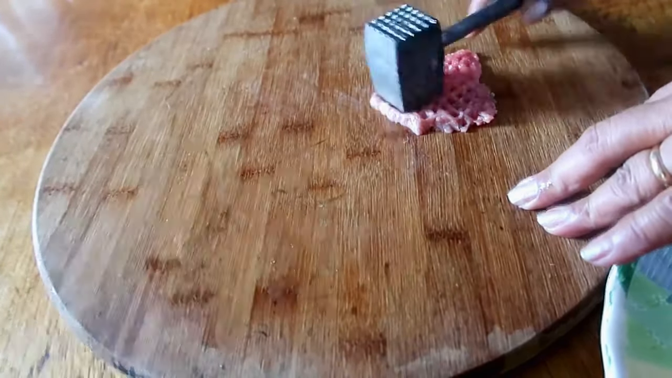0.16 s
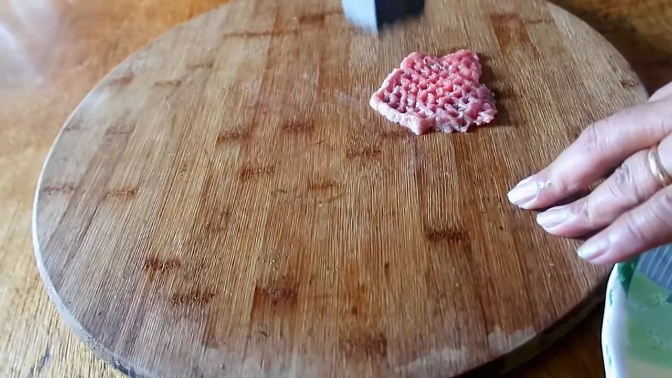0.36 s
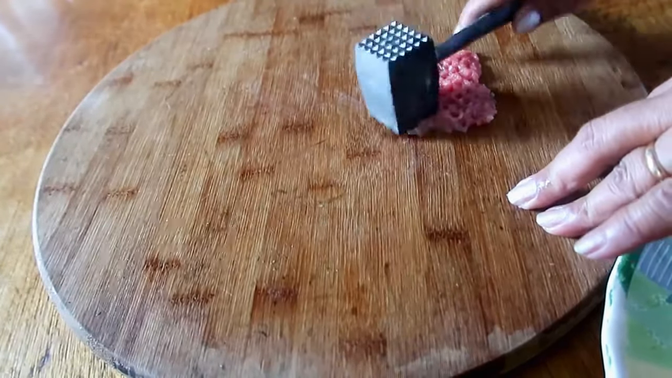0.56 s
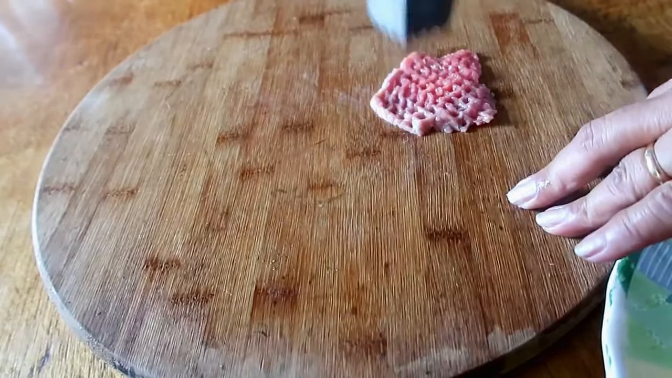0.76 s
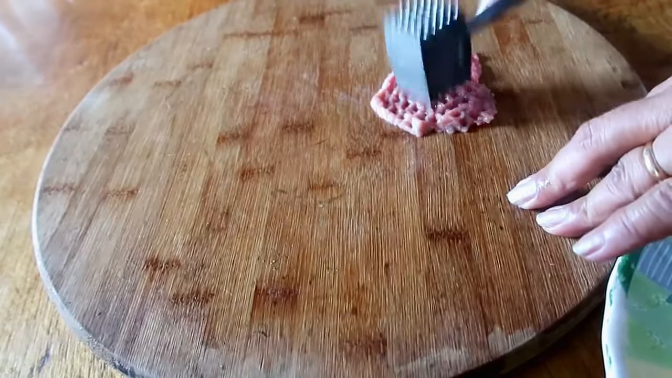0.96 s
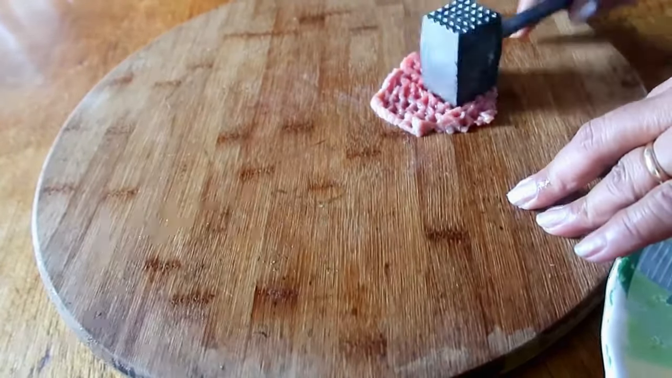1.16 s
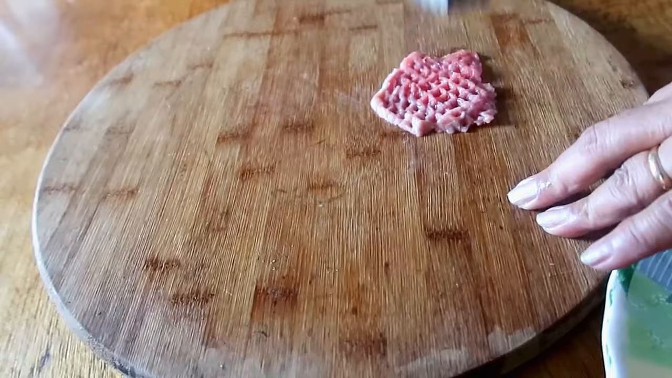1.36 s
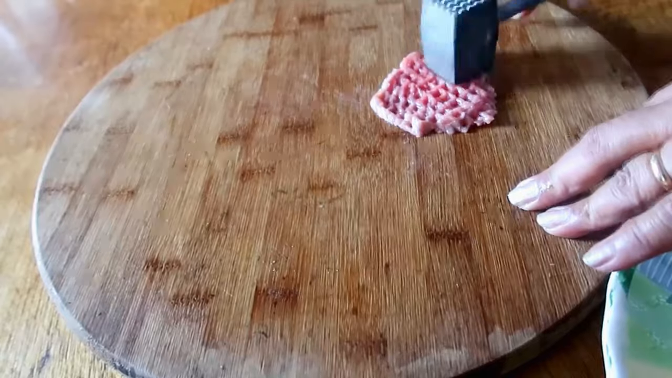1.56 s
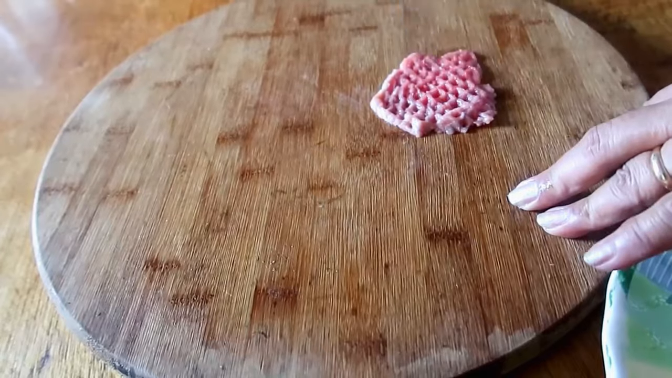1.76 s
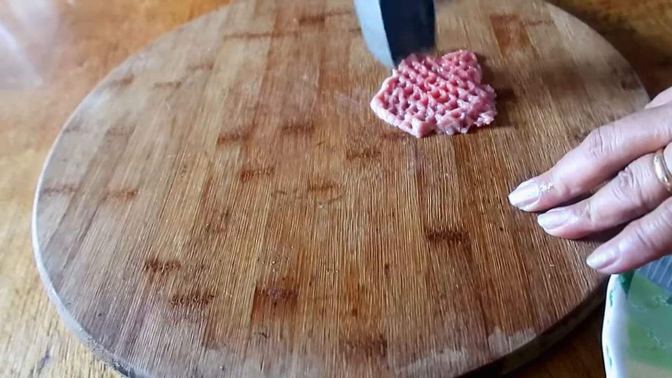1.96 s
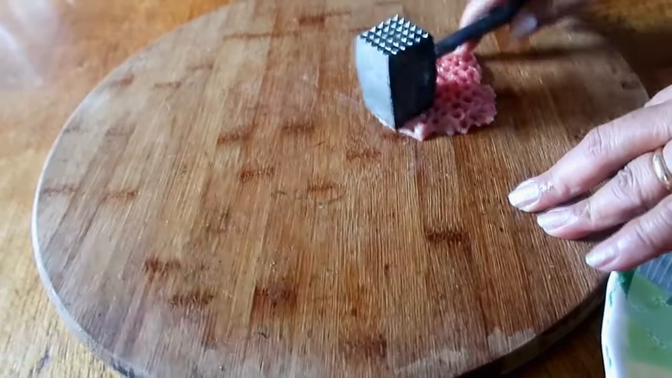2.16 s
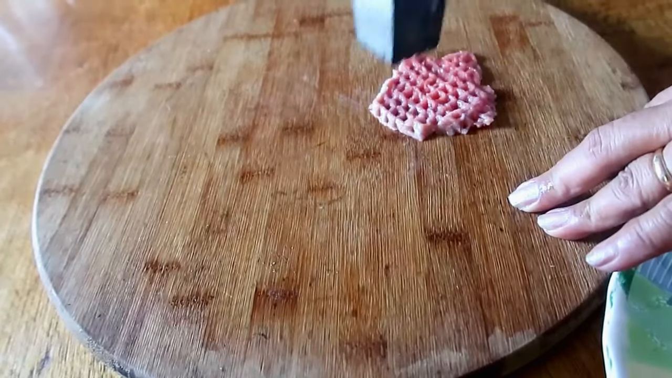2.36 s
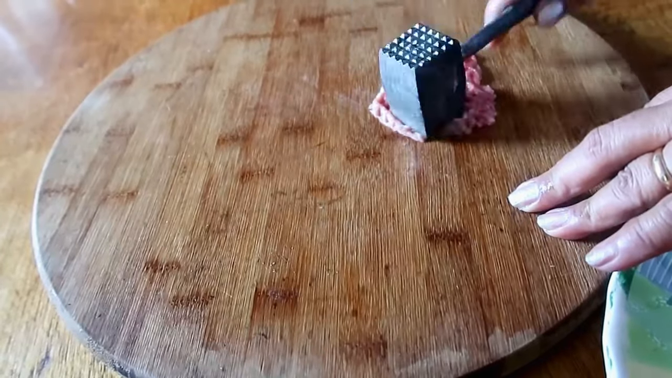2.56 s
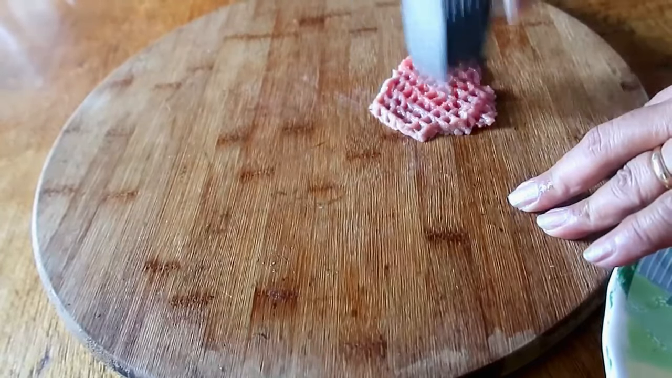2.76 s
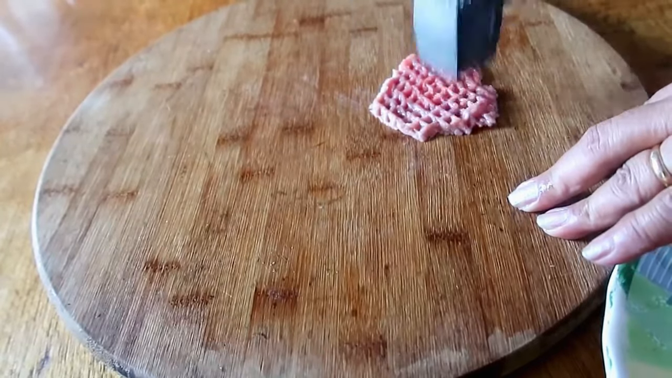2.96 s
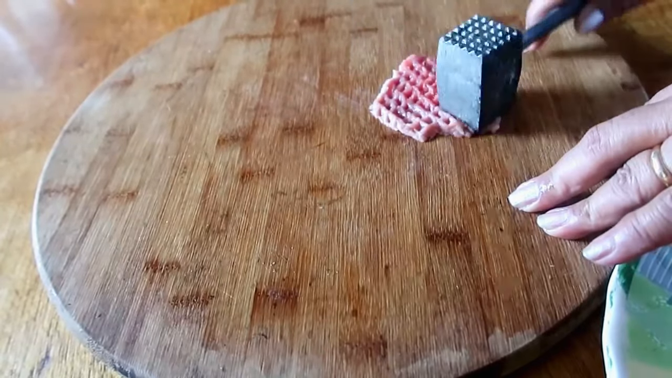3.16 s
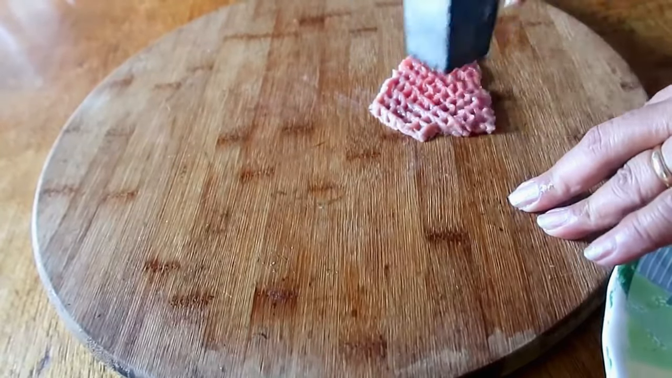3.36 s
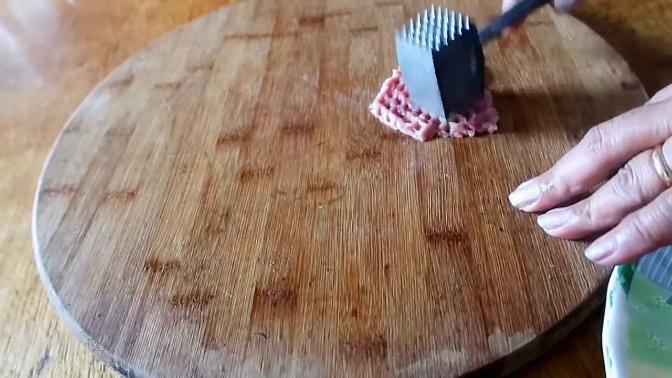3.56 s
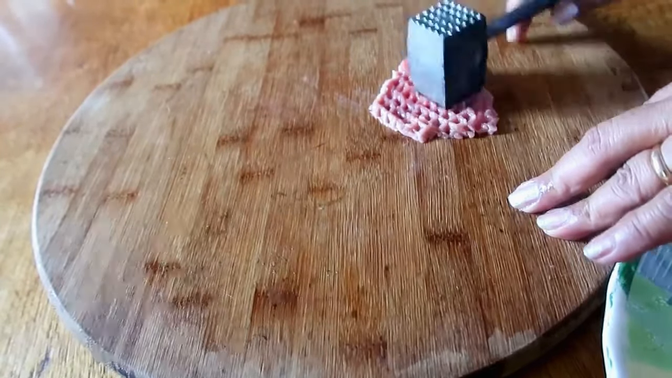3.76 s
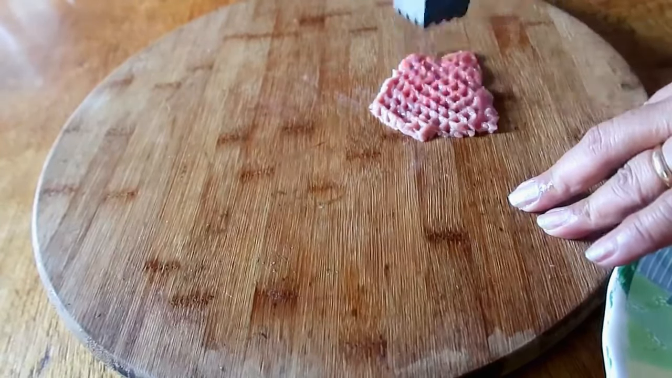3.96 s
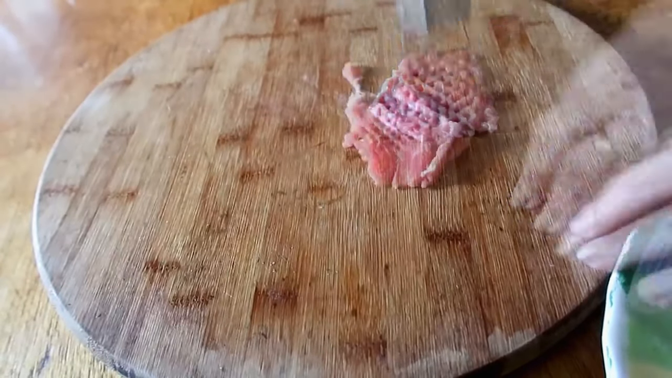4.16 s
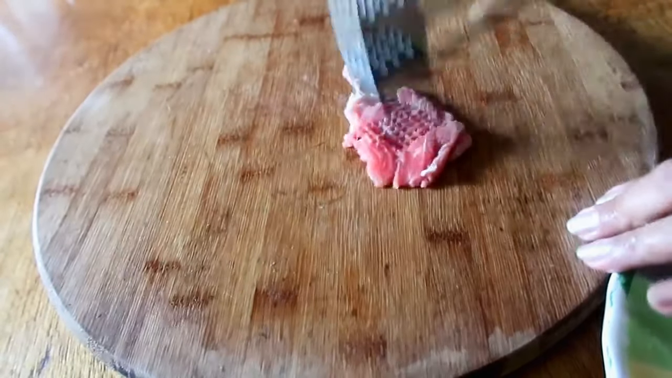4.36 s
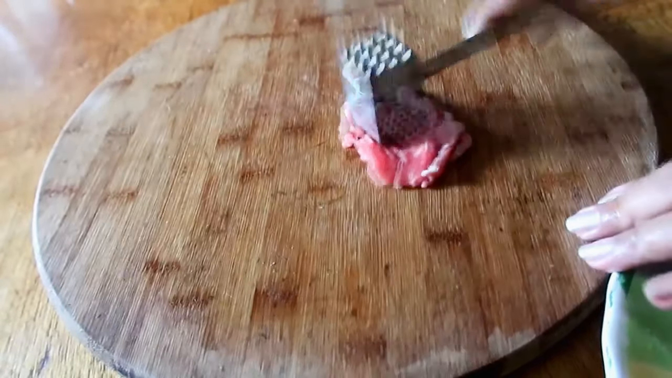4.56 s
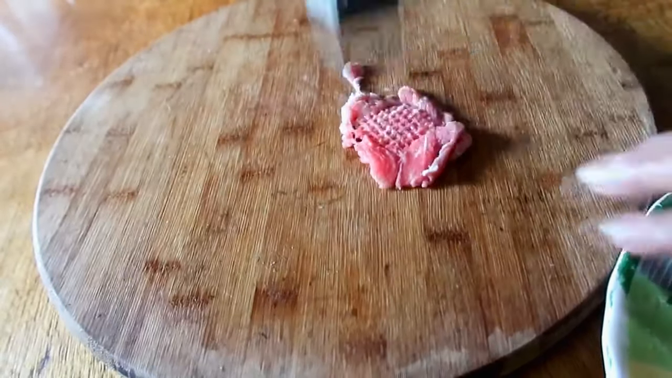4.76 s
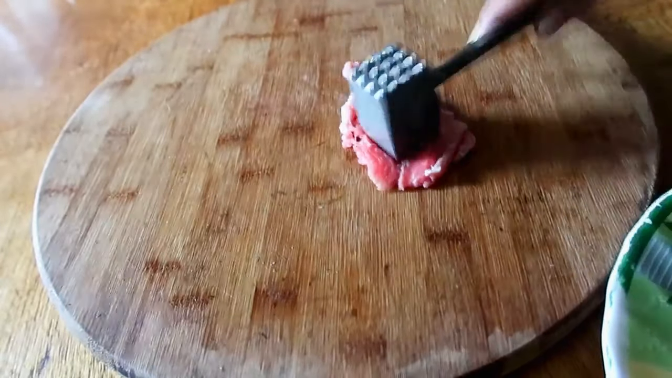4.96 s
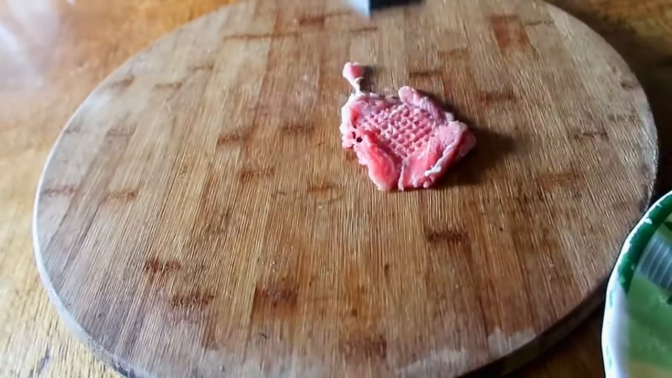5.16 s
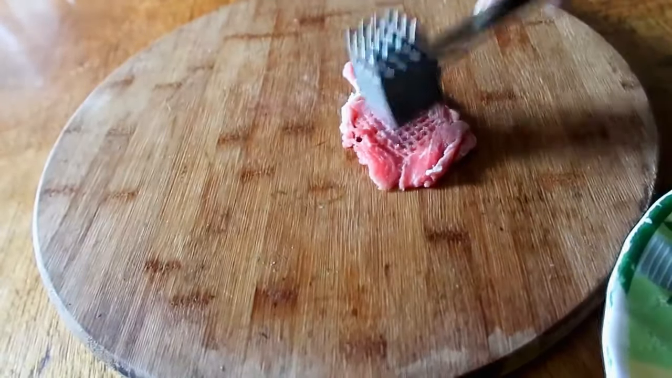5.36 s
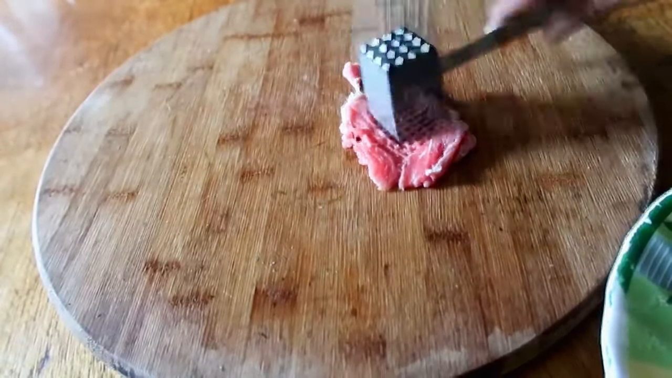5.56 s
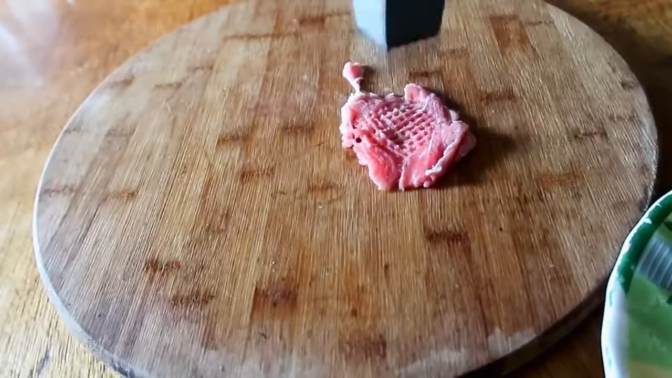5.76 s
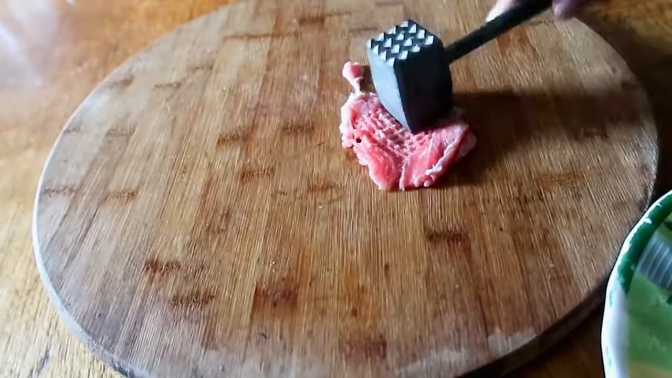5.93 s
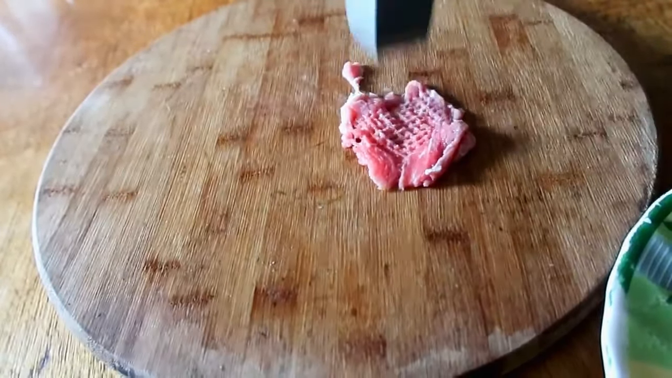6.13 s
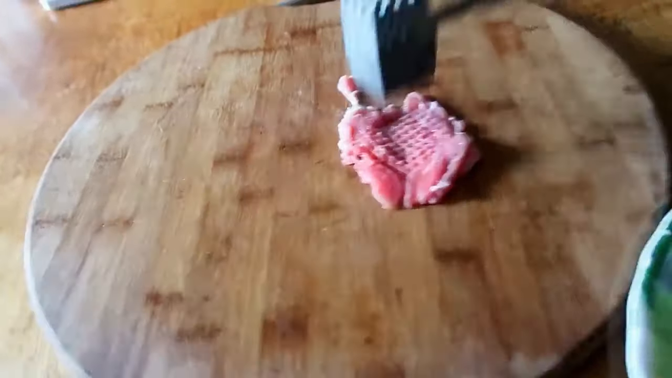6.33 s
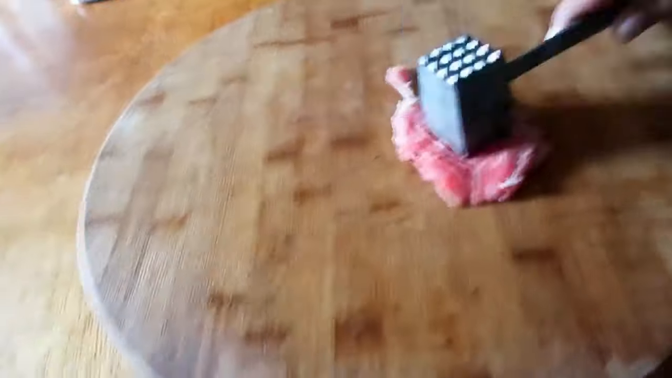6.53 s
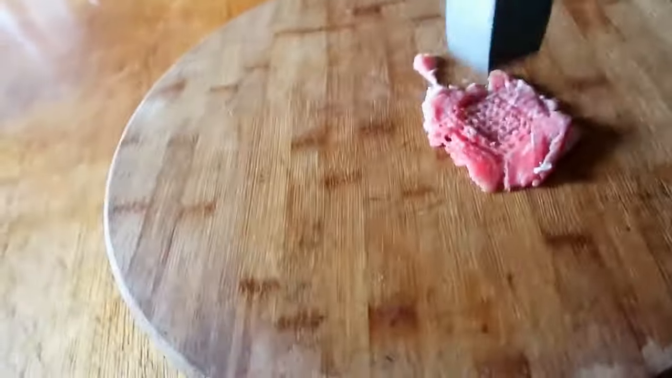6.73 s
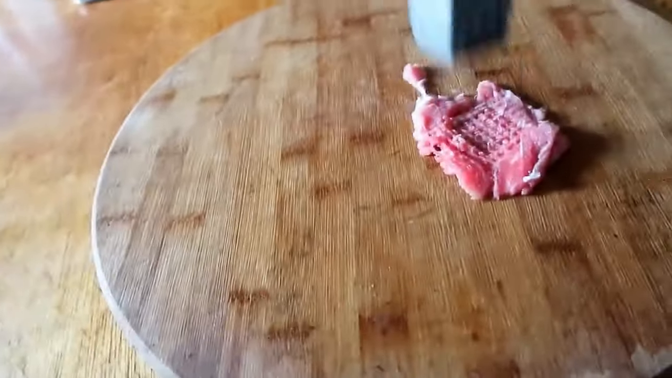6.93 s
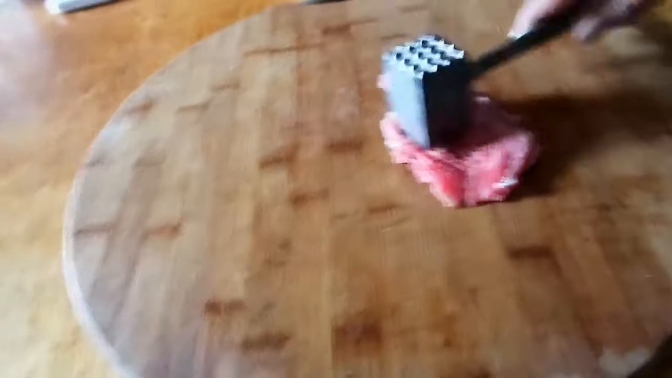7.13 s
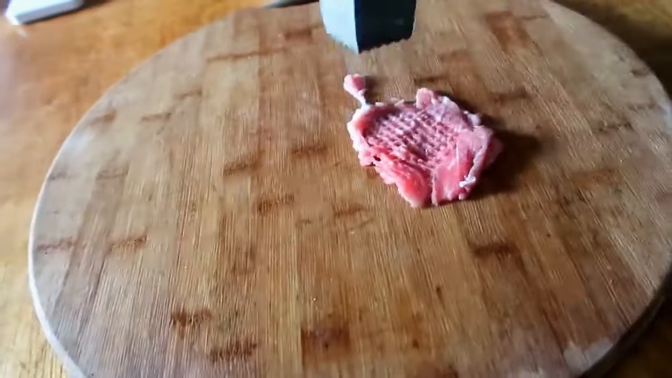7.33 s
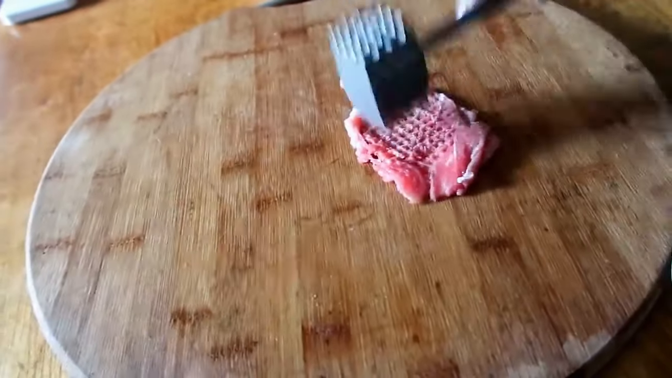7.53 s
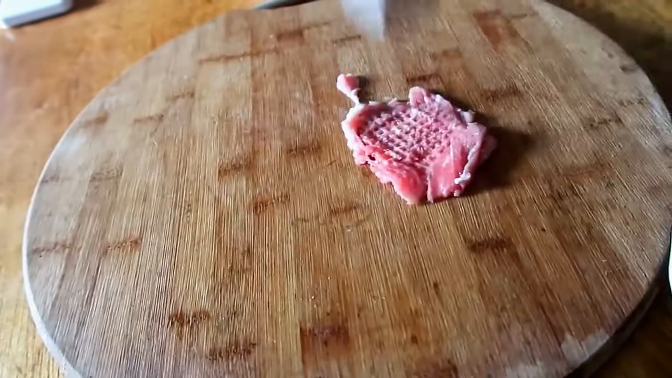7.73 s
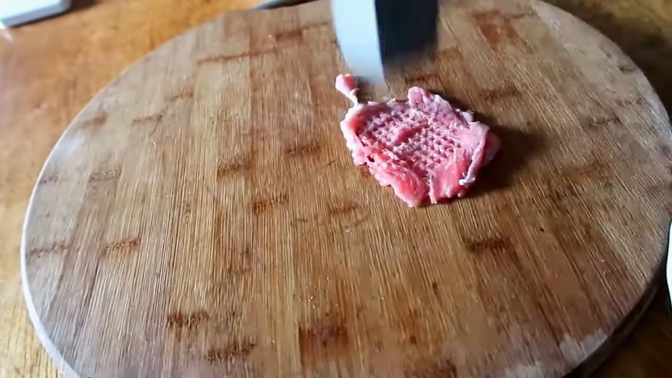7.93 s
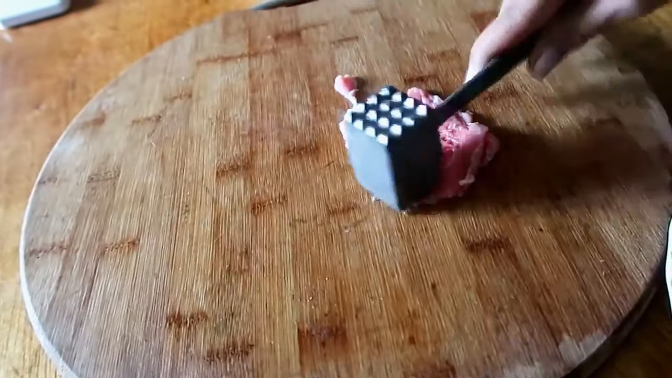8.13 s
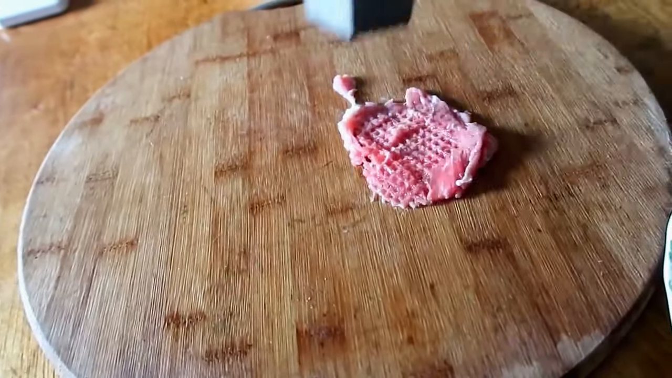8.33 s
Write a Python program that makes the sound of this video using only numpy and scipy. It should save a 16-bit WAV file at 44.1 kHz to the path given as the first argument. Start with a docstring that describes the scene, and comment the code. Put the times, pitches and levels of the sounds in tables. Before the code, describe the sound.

Close, loud pounding of meat on a wooden chopping board, regular and brisk, already under way at the start and continuing to the end. Sharp, dry knocks carry a little wet smack and juicy spitting, strongest in the middle and near the end. Faint sticky rustles come between early hits, small ticks and one dull board nudge later. Low soft room noise lies beneath, with a short kitchen tail on every strike.

```python
"""A metal mallet pounds a thin slice of beef on a round wooden board in a kitchen, about three blows a second.
Each blow drives the board's modes twice: a broad push through the meat (thud), a short bite from the studs (knock).
Noise bursts make the wood's crack, the wet slap and the spitting juice; the steel head rings faintly.
Peeling rustles are grainy noise, ticks are small ringing modes, and the board is nudged once.
All of these get wall echoes and a room tail; a low coloured noise lies beneath."""
import sys
import numpy as np
from scipy import signal
from scipy.fft import rfft, irfft, next_fast_len
from scipy.io import wavfile

SR = 44100
rng = np.random.default_rng(int(sys.argv[2]) if len(sys.argv) > 2 else 0)


def transcribe(u):
    """Save the signal u as a 16-bit wav file named by the first command-line argument.

    u: samples, shape (n,) or (channels, n), limited to [-1, 1]; the rate is SR.
    q: integer samples, one column per channel.
    """
    v = np.clip(np.atleast_2d(u).T, -1, 1)
    q = np.round(v * 32767).astype(np.int16)
    wavfile.write(sys.argv[1], SR, q)


N = 369997

# Mallet blows; thinner meat, shorter contact. clack_db: change of the board's clack mode;
# squelch_db: before the brightness tilt.
# Columns: start_s, strength_db, contact_time_constant_ms, clack_db, squelch_db
MALLET_BLOWS = [(0.3073, 3.5, 0.047, 0, -14.5), (.6463, 1.5, 0.04, 3, -15.5), (0.9718, 1, 0.19, 2.5, -19.5),
                (1.3111, 6, .26, 3, -13.5), (1.652, 3, 0.058, 3.5, -14), (1.9813, 2, 0.12, -5, -16),
                (2.3075, 3.5, .096, 3, -14), (2.616, 2, .19, 8, -14), (2.9434, 2.5, 0.067, -2.5, -12),
                (3.276, 2, 0.1, 5.5, -12.5), (3.5785, 4.5, 0.42, 0, -17.5), (3.8961, 4, 0.088, -2, -13.5),
                (4.178, 2.5, 0.11, 1, -24), (4.39, 8.5, 0.27, 0, -7), (4.7361, 6.5, 0.24, -8, -9.5),
                (5.07, 6.5, .2, 2, -10), (5.397, 7.5, 0.23, 0.5, -10), (5.716, 5, 0.22, -15, -8.5),
                (6.0214, 6, 0.32, -9, -8.5), (6.343, 6.5, 0.21, 3, -9), (6.668, 2.5, 0.068, 6, -14.5),
                (6.9459, 3, 0.077, 6.5, -17), (7.2738, 1.5, 0.064, 0.5, -15), (7.5836, 4.5, .16, 6.5, -6.5),
                (7.9451, 8.5, 0.3, 10, -11.5), (8.2892, 1.5, 0.043, 10.5, -13.5)]
# Blow still dying away as the scene opens.
# Columns: strength_db, contact_time_constant_ms, clack_db, squelch_db
EARLIER_BLOW = (8, 0.4, -6, -18)
# Board on its table, before each blow's changes. Columns: mode_hz, level_db, t60_s
BOARD_MODES = [(67.66, -28.5, 0.46), (120.3, -15.5, 0.061), (136.9, -16, 0.19), (198, -25.5, 0.16),
               (250, -14.5, 0.15), (297.3, -27.5, 0.23), (328.8, -18.5, 0.098), (384.3, -26, 0.17),
               (445, -19, 0.061), (532, -7.5, 0.021), (613, -9, 0.057), (847, 0.5, 0.014),
               (1010, -33, 0.084), (1030, -30, 0.055), (1380, -2.5, 0.017), (1630, -2, 0.011),
               (1897, -15, 0.026), (2006, -13, 0.0055), (2690, -20.5, 0.016), (3120, -21, 0.022)]
# Steel mallet head, before scatter. Columns: mode_hz, level_db, t60_s
HEAD_MODES = [(4790, -56, 0.18), (8930, -58.5, 0.21), (10920, -59.5, 0.23), (13250, -62, 0.1)]
# Board's many overlapping upper modes, heard as a crack. Columns: freq_hz, relative_db_per_hz
CRACK_COLOUR = [(300, 8), (700, 32.5), (1000, 25), (1800, 23), (2600, 22), (3500, 17), (6000, 9),
                (12000, -30)]
# Dull slap of the wet meat. Columns: freq_hz, relative_db_per_hz
SLAP_COLOUR = [(150, -14), (500, 12), (1200, 8.5), (2500, 1.5), (4000, -15), (8000, -30), (16000, -20)]
# Juice spitting between the studs, before the tilt. Columns: freq_hz, relative_db_per_hz
SPIT_COLOUR = [(500, -29), (1500, -16), (3000, 9.5), (5000, 5.5), (8000, 2.5), (13000, -3), (16000, -15)]
# Near and farther wall echoes, before dulling. Columns: delay_s, level_db
WALL_ECHOES = [(.0062, -14.5), (0.025, -34)]
# Room tail colour. Columns: freq_hz, relative_db
ROOM_COLOUR = [(50, -16), (140, -14.5), (300, -5.5), (600, -3), (1000, -0.5), (1800, -1.5), (3000, -1),
               (6000, -6), (11000, -9), (15000, -14)]
# Room tail decay. Columns: freq_hz, t60_s
ROOM_DECAY = [(60, 0.64), (300, 0.28), (1100, 0.38), (3000, 0.35), (8000, 0.3), (14000, 0.3)]
# Diffuse sound at the two microphone ports. Columns: freq_hz, left_right_correlation
PORT_LIKENESS = [(200, 0.99), (500, 0.99), (1000, 0.99), (2000, 0.93), (4000, 0.35), (8000, 0.028)]
# Direct sound: phase by which the left port leads. Columns: freq_hz, lead_rad
PORT_LEAD = [(200, 0), (1000, -0.28), (3500, -0.54), (5000, 1), (7000, -1.2), (12000, -1.54)]
# Soft rustles as the meat lets go and settles. Columns: start_s, level_db, decay_time_constant_s
MEAT_RUSTLES = [(0.0, -54.5, 0.068), (0.18, -58, 0.034), (0.494, -47, 0.029), (0.55, -54.5, 0.041),
                (1.58, -55, .08), (2.16, -67, .05), (4.98, -66, 0.04)]
# Rustle colour. Columns: freq_hz, relative_db_per_hz
RUSTLE_COLOUR = [(300, -6), (1500, 5.5), (3500, 0), (7000, -9.5), (12000, -17), (16000, -29)]
# Background colour. Columns: freq_hz, relative_db_per_hz
BACKGROUND_COLOUR = [(15, -56), (25, -33.5), (54, -8), (135, -2.5), (264, -1.5), (450, -14.5), (588, -10),
                     (729, -17.5), (927, -15), (1760, -20), (4040, -35.5), (10900, -50), (15000, -80)]
# Background level, before trim and reduced drift. Columns: time_s, relative_level_db
BACKGROUND_LEVEL = [(0.0, -50), (0.11, -47.5), (3.97, -52), (4.3, -45), (5.77, -51.5), (6.94, -41),
                    (7.01, -48), (8.39, -49)]
# Small light ticks, before trim. Columns: start_s, relative_level_db
LIGHT_TICKS = [(6.5943, -48), (6.646, -36), (6.715, -44), (6.86, -38), (7.0564, -42.5), (7.4046, -37),
               (7.433, -46), (7.4674, -47), (8.081, -46)]
# What a tick rings with, before scatter. Columns: mode_hz, level_db, t60_s
TICK_MODES = [(1510, -2, 0.013), (3450, -3, 0.0065), (4670, -1, 0.017), (6840, -12, 0.011),
              (10700, -19, 0.0086)]

CLACK_HZ, SEESAW_HZ, TOP_HZ = 1380, 560, 16000
STUD_SHARE = 0.42  # part of every push that goes straight into the wood; the meat cushions the rest
EARLIER_S, LEAD_IN_S = -0.05, 0.01  # lead-in: room for a sound's rise before its nominal time
BUMP_S, BUMP_DB = 6.616, -13


def amp(db):
    """Decibels to gain."""
    return 10 ** (np.asarray(db) / 20)


def along(points, hz):
    """(freq_hz, value) points joined on a log-frequency axis."""
    f, v = np.transpose(points)
    return np.interp(np.log(hz + 1), np.log(f), v)


def filtered(x, response):
    """x shaped by a response of frequency."""
    n = x.shape[-1]
    padded = next_fast_len(n + SR // 8)
    spectrum = rfft(x, padded) * response(np.fft.rfftfreq(padded, 1 / SR))
    return irfft(spectrum, padded)[..., :n]


def add(track, start_s, sound):
    """Mix a sound into the track, cut at both ends of the scene."""
    start = int(round(start_s * SR))
    sound = sound[..., max(-start, 0):N - start]
    first = max(start, 0)
    track[..., first:first + sound.shape[-1]] += sound


def ring(modes, change_db):
    """Decaying modes set off by a tap, each with its own change of level."""
    hz, db, t60 = np.transpose(modes)[:, :, None]
    t = np.arange(SR // 2) / SR
    # low modes push the air together; higher ones have nodal lines and alternate in sign
    sign = (-1.0) ** np.cumsum(hz > SEESAW_HZ)[:, None]
    envelope = amp(db + change_db[:, None] - 60 * t / t60)
    return np.sum(sign * envelope * np.cos(2 * np.pi * hz * t), axis=0)


def diffuse(count, spectrum):
    """Coloured noise from all sides: alike at both ports in the bass, unrelated in the treble."""
    def mid_side_gain(hz):
        angle = np.arccos(np.clip(along(PORT_LIKENESS, hz), -1, 1)) / 2
        return amp(along(spectrum, hz)) * [np.cos(angle), np.sin(angle)]

    mid, side = filtered(rng.standard_normal((2, count)), mid_side_gain)
    return np.array([mid + side, mid - side])


def room_tail(wet_db, gap_s, build_s):
    """Diffuse noise that builds up after a gap and dies band by band."""
    count = SR // 2
    t = np.arange(count) / SR
    hz, frames_s, bands = signal.stft(diffuse(count, ROOM_COLOUR), SR, nperseg=256)
    t60 = along(ROOM_DECAY, hz)[:, None]
    # the root evens out the energy of long and short decays
    fade = amp(-60 * frames_s / t60) * np.sqrt(2 * np.log(1000) / (t60 * SR))
    tail = signal.istft(bands * fade, SR, nperseg=256)[1][:, :count]
    return amp(wet_db) * tail * (1 - np.exp(-np.maximum(t - gap_s, 0) / build_s))


def in_kitchen(sound, wet_db=0, gap_s=0.0011, build_s=0.0091, wall_hz=2500):
    """Direct sound at both ports with delayed, low-passed wall echoes, plus the room tail."""
    def direct_and_walls(hz):
        echoes = sum(amp(db) * np.exp(-2j * np.pi * hz * s) for s, db in WALL_ECHOES)
        ports = np.exp(0.5j * np.outer([1, -1], along(PORT_LEAD, hz)))
        return ports * (1 + echoes / (1 + 1j * hz / wall_hz))

    tail = room_tail(wet_db, gap_s, build_s)
    early = filtered(sound, direct_and_walls)
    return early + signal.fftconvolve(sound[None], tail, axes=1)[:, :len(sound)]


def squish(t, spectrum, rise_s, fall_s, seep_db, seep_fall_s=0.032, grain_db=2):
    """Burst of grainy noise that peaks at t = 0 and lingers faintly."""
    burst = np.exp(np.minimum(t, 0) / rise_s - np.maximum(t, 0) / fall_s)
    seep = amp(seep_db) * (t > 0) * np.exp(-np.abs(t) / seep_fall_s)
    noise = rng.standard_normal(len(t)) * amp(grain_db * rng.standard_normal(len(t)))
    grains = (burst + seep) * noise
    return filtered(grains / np.linalg.norm(grains), lambda hz: amp(along(spectrum, hz)))


def spit(t, squelch_db, usual_db=-14, brighten=0.29, pivot_hz=4500):
    """Juice spits out between the studs: the wetter the blow, the brighter."""
    burst = amp(squelch_db) * squish(t, SPIT_COLOUR, rise_s=0.0009, fall_s=0.00055, seep_db=-32)
    tilt_db_per_octave = brighten * (squelch_db - usual_db)
    # the tilt levels off one octave below the pivot
    return filtered(burst, lambda hz: amp(tilt_db_per_octave * np.log2(np.maximum(hz / pivot_hz, 0.5))))


def blow(strength_db, contact_ms, clack_db, squelch_db, cushion_s=0.00039, scatter_db=1.2):
    """A broad push through the meat and a short bite from the studs drive the board."""
    t = np.arange(SR // 2) / SR - LEAD_IN_S
    push = np.exp(-0.5 * (t / cushion_s) ** 2)
    u = np.maximum(t, 0) * 1000 / max(contact_ms, 0.02)
    bite = u ** 2 * np.exp(-u)
    thud = amp(strength_db) * (1 - STUD_SHARE)
    knock = amp(strength_db) * STUD_SHARE
    force = thud * push / push.sum() + knock * bite / bite.sum()

    # the spot struck sets how strongly each mode answers, above all the clack
    mode_hz = np.transpose(BOARD_MODES)[0]
    clack = np.exp(-(np.log(mode_hz / CLACK_HZ) / 0.2) ** 2)
    wood = ring(BOARD_MODES, clack_db * clack + scatter_db * rng.standard_normal(len(BOARD_MODES)))
    # the force already holds the lead-in, so the crack response starts at its peak
    crack = squish(t + LEAD_IN_S, CRACK_COLOUR, rise_s=0.0005, fall_s=0.0047, seep_db=-52)
    board = signal.fftconvolve(force, wood + crack)[:len(t)]

    steel = ring(HEAD_MODES, 2 * scatter_db * rng.standard_normal(len(HEAD_MODES)))
    head = np.pad(steel, (np.sum(t < 0), 0))[:len(t)]
    slap = thud * squish(t, SLAP_COLOUR, rise_s=0.00077, fall_s=0.0031, seep_db=-38)
    return board + head + slap + spit(t, squelch_db)


def pounding():
    """The run of blows; the first lands just before the scene opens."""
    track = np.zeros((2, N))
    for start_s, *stroke in [(EARLIER_S, *EARLIER_BLOW)] + list(MALLET_BLOWS):
        add(track, start_s - LEAD_IN_S, in_kitchen(blow(*stroke)))
    return track


def rustles(rise_s=0.0089, grain_db=5):
    """Sticky meat peels in a short rush of tiny crackles: noise of uneven grain under a swell."""
    track = np.zeros((2, N))
    t = np.arange(SR // 2) / SR
    for start_s, level_db, decay_s in MEAT_RUSTLES:
        grains = rng.standard_normal(len(t)) * amp(grain_db * rng.standard_normal(len(t)))
        grains = filtered(grains, lambda hz: amp(along(RUSTLE_COLOUR, hz)))
        swell = (1 - np.exp(-t / rise_s)) * np.exp(-t / decay_s)
        add(track, start_s, amp(level_db) * in_kitchen(swell * grains / grains.std()))
    return track


def background(trim_db=-2.0, follow=0.64):
    """Low diffuse room noise whose level drifts by a reduced share of its table."""
    noise = diffuse(N, BACKGROUND_COLOUR)
    time_s, db = np.transpose(BACKGROUND_LEVEL)
    drift_db = np.interp(np.arange(N) / SR, time_s, db - db.mean())
    return amp(trim_db + db.mean() + follow * drift_db) * noise / noise.std()


def ticks(trim_db=-1, faint_db=-53, scatter_db=2, faint_count=5):
    """Light, dry ringing ticks between the later blows, a few faint ones at random among them."""
    track = np.zeros((2, N))
    faint_s = rng.uniform(LIGHT_TICKS[0][0], LIGHT_TICKS[-1][0], faint_count)
    faint = [(start_s, faint_db) for start_s in faint_s]
    for start_s, level_db in list(LIGHT_TICKS) + faint:
        tick = ring(TICK_MODES, scatter_db * rng.standard_normal(len(TICK_MODES)))
        add(track, start_s, amp(level_db + trim_db) * in_kitchen(tick, wet_db=-9))
    return track


def bump(soft_hz=600):
    """The board is nudged once, dully, just before a blow: its modes without highs or deepest lows."""
    track = np.zeros((2, N))

    def touch(hz):
        # too light to stir the lowest modes
        return hz / (hz + 400) / (1 + (hz / soft_hz) ** 4)

    wood = ring(BOARD_MODES, np.zeros(len(BOARD_MODES)))
    wood = filtered(np.pad(wood, (round(LEAD_IN_S * SR), 0)), touch)
    add(track, BUMP_S - LEAD_IN_S, amp(BUMP_DB) * in_kitchen(wood))
    return track


def scene():
    """Sum of all layers at both ports."""
    return pounding() + rustles() + background() + ticks() + bump()


def record(dry, low_cut_hz=62, right_db=0.8):
    """The microphone sheds deep bass, flattens the hardest knocks near full scale and limits the band."""
    high_pass = signal.butter(2, low_cut_hz, "highpass", fs=SR, output="sos")
    heard = signal.sosfilt(high_pass, dry)
    # above the bass the right port is slightly the louder
    heard = filtered(heard, lambda hz: amp(np.outer([-0.5, 0.5], right_db * hz ** 2 / (hz ** 2 + 350 ** 2))))
    clipped = heard / (1 + np.abs(heard) ** 8) ** (1 / 8)
    return filtered(clipped, lambda hz: 1 / (1 + (hz / TOP_HZ) ** 80))


dry = scene()
out = record(dry)
transcribe(out)
```